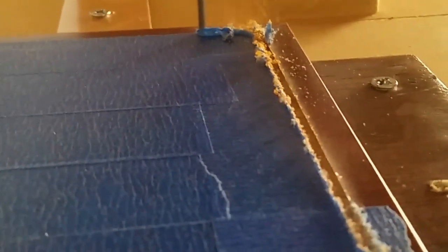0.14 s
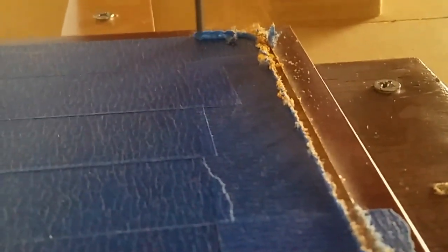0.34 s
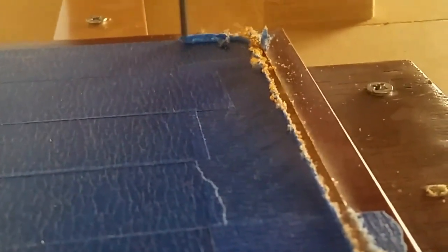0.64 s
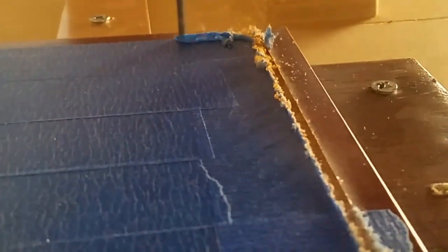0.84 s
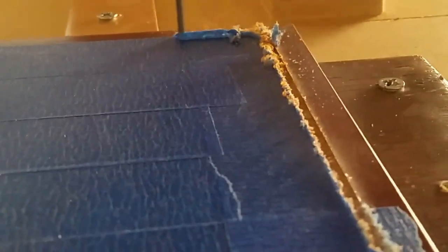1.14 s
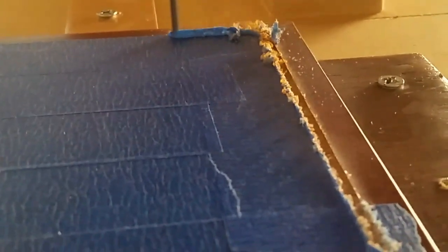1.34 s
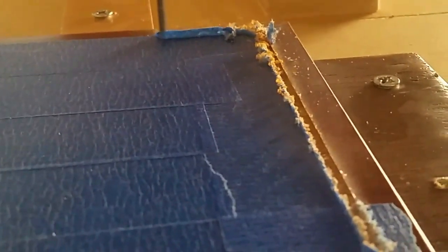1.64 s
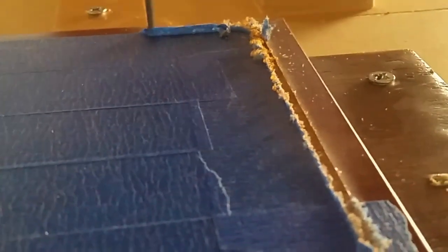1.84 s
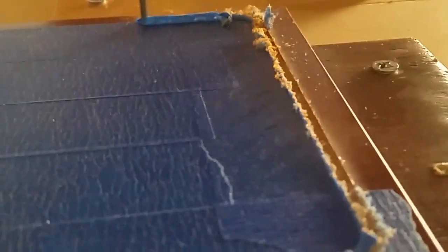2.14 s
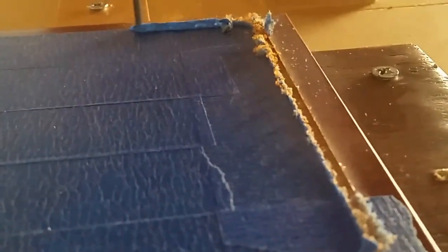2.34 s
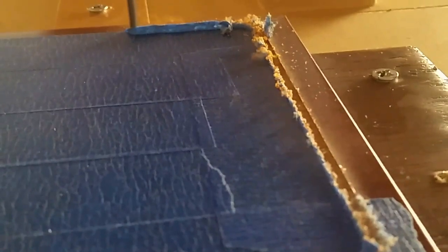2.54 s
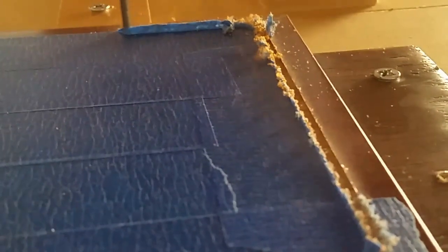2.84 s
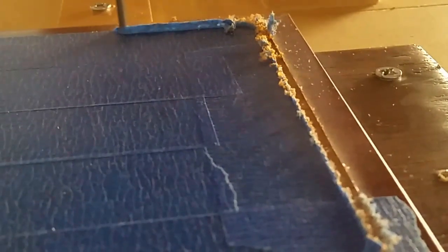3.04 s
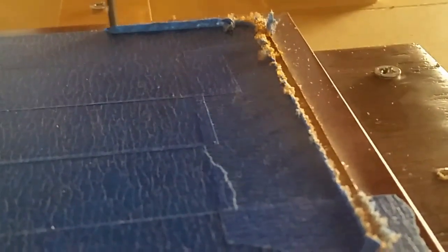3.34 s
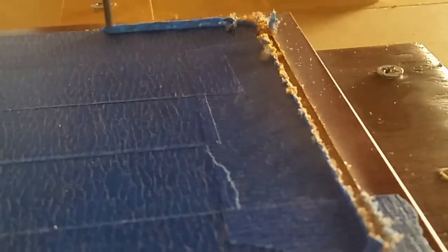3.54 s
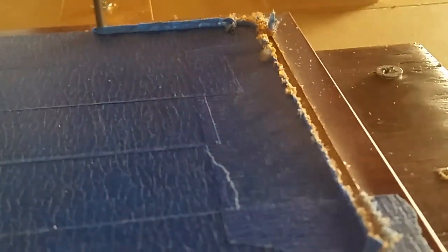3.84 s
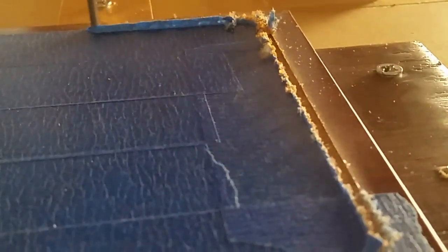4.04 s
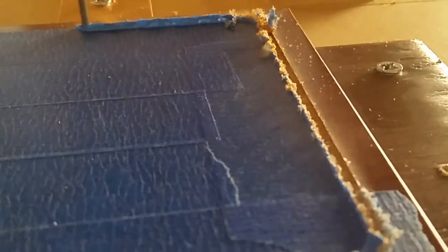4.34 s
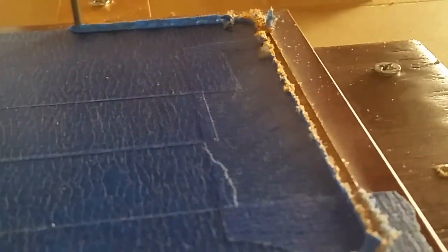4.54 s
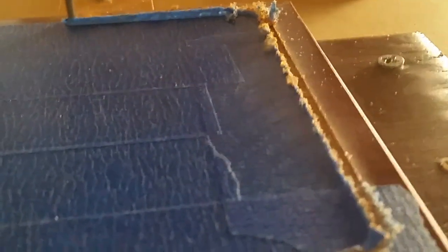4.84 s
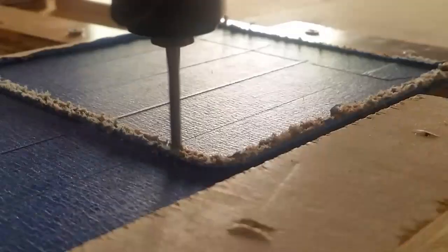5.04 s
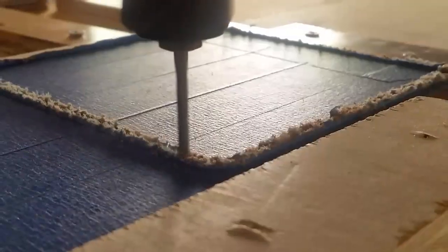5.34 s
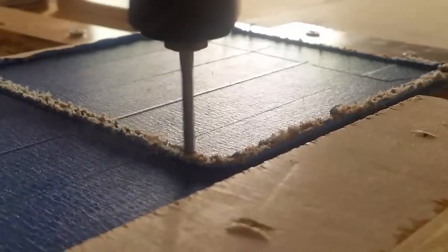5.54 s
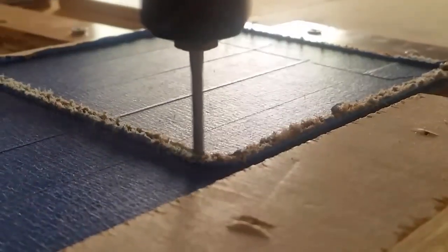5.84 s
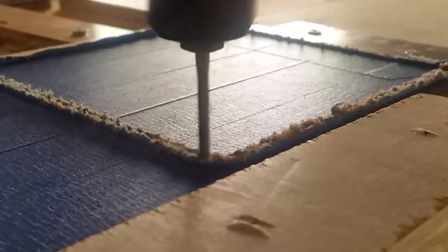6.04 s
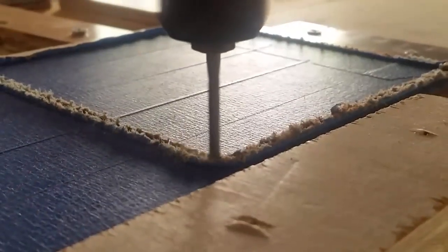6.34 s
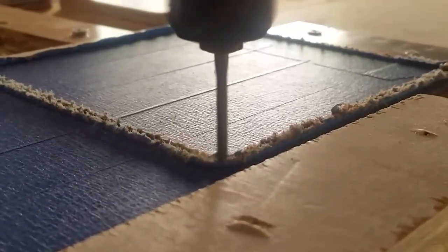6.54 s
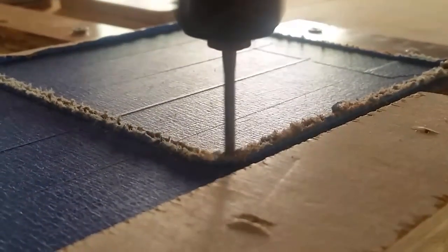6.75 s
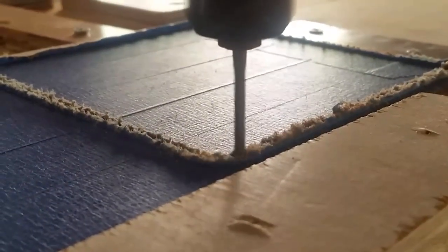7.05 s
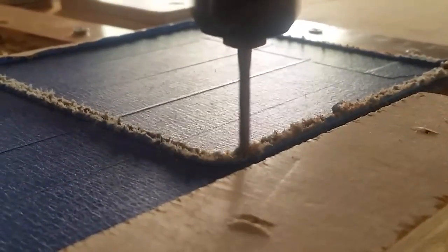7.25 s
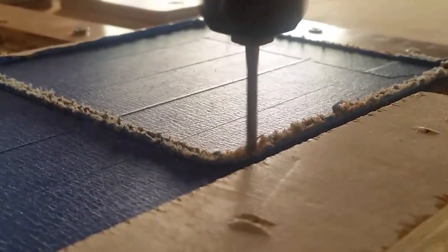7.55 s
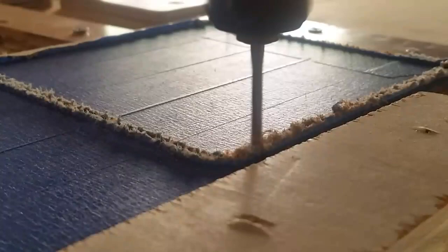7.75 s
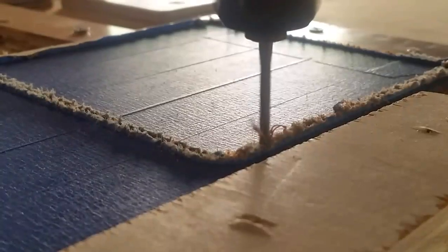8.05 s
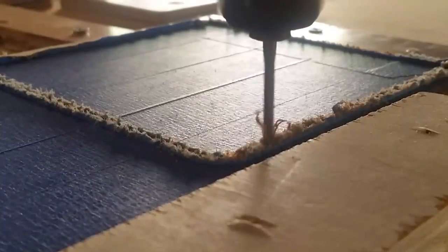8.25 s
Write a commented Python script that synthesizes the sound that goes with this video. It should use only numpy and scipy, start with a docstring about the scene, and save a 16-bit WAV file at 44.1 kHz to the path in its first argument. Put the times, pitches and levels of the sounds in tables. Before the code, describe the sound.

Close and dry, a fast spindle drones around a mid-low pitch with many piercing overtones, over rushing fan air and the sizzling scrape of a cutter in hard wood. Two soft thuds occur during this harsh cut. After about five seconds it stops dead, silent for under half a second. A much softer whine and fan rush then swell in, with short gliding feed-motor hums at the bend and low thumps near the end.

```python
"""In a workshop, a CNC router cuts a hardwood board: first deep along a straight edge, then, after a
short silence, lightly round a corner. The spindle turns about 435 times a second and whines on its multiples.
Its fan rushes as shaped noise; in the deep cut, blurred bearing tones sing and chips ring the cutter's modes.
The feed motors hum in gliding tones through the bend, dull knocks are dotted about, and a limiter
holds the peaks."""
import sys
import numpy as np
from scipy import signal
from scipy.fft import rfft, irfft, next_fast_len
from scipy.io import wavfile
from scipy.ndimage import uniform_filter1d, minimum_filter1d

SR = 44100
rng = np.random.default_rng(int(sys.argv[2]) if len(sys.argv) > 2 else 0)


def log_audio(samples):
    """Write samples as a 16-bit WAV file to the path given in sys.argv[1]."""
    # one column per channel
    frames = np.atleast_2d(samples).T
    # limit to full scale, then quantise
    limited = np.clip(frames, -1, 1)
    pcm = np.round(limited * 32767).astype(np.int16)
    wavfile.write(sys.argv[1], SR, pcm)


N = 369999
TIME = np.arange(N) / SR  # s
PADDED = next_fast_len(N)
FREQ = np.maximum(np.arange(PADDED // 2 + 1) * SR / PADDED, 1)  # Hz, kept off zero

# the spindle's whine in each part of the two cuts:
# multiple of the speed, edge_start_db, edge_end_db, before_bend_db, after_bend_db
WHINE_LEVELS = [(1, -25.5, -25, -30.5, -31.5), (2, -20, -21.5, -31, -33), (3, -28, -30.5, -35, -32),
                (4, -35, -36.5, -39.5, -48), (5, -33, -43.5, -40.5, -36.5), (6, -32, -38.5, -49, -49),
                (7, -32.5, -39, -50, -44.5), (8, -56.5, -46, -57, -58), (9, -41.5, -41.5, -47, -41.5),
                (10, -33.5, -32.5, -40, -40.5), (11, -44.5, -43.5, -57, -57), (12, -40.5, -54.5, -54, -53),
                (13, -46.5, -41.5, -48, -44), (14, -36, -35.5, -45, -44.5), (15, -29, -40.5, -39, -40.5),
                (16, -34, -44.5, -42, -41), (17, -50, -45, -55, -44), (18, -59.5, -49.5, -62, -61),
                (20, -64.5, -44, -58, -55), (22, -45, -43, -38.5, -37.5), (23, -63, -59.5, -58, -54),
                (27, -65, -62.5, -60, -54)]
# spectrum of the fan air and the rush of dust; the deep cut's air also sinks a little along the edge:
# pitch_hz, deep_cut_db_per_hz (relative), corner_cut_db_per_hz
AIR_SPECTRUM = [(25.2, -92, -90), (45, -86, -78), (70, -67.5, -69), (157, -59.5, -62.5), (454, -60, -62.5),
                (1060, -54, -59.5), (2400, -60, -63.5), (4080, -59.5, -64.5), (5450, -60.5, -66.5),
                (6740, -59.5, -67.5), (7560, -57.5, -68.5), (8710, -69, -76), (9970, -72, -70.5),
                (11800, -65, -67.5), (15500, -66.5, -68)]


def undb(db):
    """Decibels to gain."""
    return 10 ** (np.asarray(db) / 20)


def unit(x):
    """Scale to rms 1."""
    return x / np.std(x)


def walk(rate):
    """A smooth random wander with spread near 1, through `rate` new values a second."""
    knots = rng.standard_normal(4096)
    place = TIME * rate % (len(knots) - 1)
    k = place.astype(int)
    part = place - k
    ease = part * part * (3 - 2 * part)
    return knots[k] + (knots[k + 1] - knots[k]) * ease


def progress(start_s, end_s):
    """Runs evenly from 0 to 1 during a move."""
    return np.interp(TIME, [start_s, end_s], [0, 1])


def bell(middle_s, half_s):
    """A smooth swell that reaches 1 at its middle."""
    return np.exp(-((TIME - middle_s) / half_s) ** 2)


def shape(x, response):
    """Filter by a frequency response."""
    return irfft(rfft(x, PADDED) * response, PADDED)[:N]


def resonance(hz, width_hz):
    """Response of one steep-sided mode, two equal stages in a row, with gain 1 at its centre."""
    detuning = (FREQ / hz - hz / FREQ) * hz / width_hz
    return 1 / (1 + 1j * detuning) ** 2


def ripple(depth):
    """The motor pulls harder twice in each mains cycle, so the level throbs at 120 Hz."""
    return 1 + depth * np.sin(2 * np.pi * 120 * TIME)


def reflected(x, share, drift):
    """A bounce off the board, about 2 ms late; its path shifts as the head moves, so the colour drifts."""
    lag_s = 0.002 * (1 + drift * walk(1.2))
    bounce = np.interp(TIME - lag_s, TIME, x)
    return (x + share * bounce) / np.sqrt(1 + share ** 2)


def shaft_angle():
    """How far the spindle has turned, in radians; it drives the whine, the fan and the chips."""
    # the spindle sags under load in the deep cut and recovers round the bend: time_s, turns_per_s
    spindle_speed = [(0, 435.6), (3.5, 434.95), (4.97, 433.8), (5.35, 435.3), (6.2, 435.3), (6.9, 436.4),
                     (8.39, 436.3)]
    turns_per_s = np.interp(TIME, *np.transpose(spindle_speed))
    return 2 * np.pi * np.cumsum(turns_per_s) / SR


def knocks():
    """Each knock is a short, broad thud of filtered noise round its pitch."""
    # dull knocks of the gantry and board: start_s, pitch_hz, level_db (of the noise, ahead of its decay)
    knock_list = [(1.795, 180, -28), (3.16, 150, -27), (7.72, 75, -36), (8.045, 90, -27), (8.205, 220, -29)]
    out = 0
    for start_s, hz, db in knock_list:
        age = np.maximum(TIME - start_s, 0)
        thud = unit(shape(rng.standard_normal(N), resonance(hz, hz)))
        envelope = np.minimum(age / 0.004, 1) * np.exp(-age / 0.03)  # 4 ms rise, 30 ms decay
        out = out + undb(db) * thud * envelope
    return out


def feed_motors():
    """A stepper's tone glides with the speed of its axis and swells as it crosses a resonance."""
    # round the bend one feed motor speeds up and the other slows down, humming where the frame resonates:
    # middle_s, half_length_s, step_tone_hz, glide_hz_per_s, level_db
    feed_hums = [(6.23, 0.028, 176.5, 500, -32.5), (6.38, 0.05, 255, 489.5, -42),
                 (6.668, 0.09, 386, -360, -38)]
    out = 0
    for middle_s, half_s, hz, glide_hz_per_s, db in feed_hums:
        steps = np.cumsum(hz + glide_hz_per_s * (TIME - middle_s)) / SR
        tone = np.sqrt(2) * np.sin(2 * np.pi * steps)
        out = out + undb(db) * bell(middle_s, half_s) * tone
    return out


def air(angle, spectrum_db, chop, flicker_db):
    """Fan rush: a low roar that throbs with the mains, and a hiss that pulses with every turn."""
    pitch_hz = np.array(AIR_SPECTRUM)[:, 0]
    density_db = np.interp(np.log(FREQ), np.log(pitch_hz), spectrum_db)
    density = undb(density_db) * np.sqrt(SR / 2)
    low = 1 / (1 + (FREQ / 1500) ** 4)  # the roar's share of the power; it hands over at 1500 Hz
    roar = rng.standard_normal(N) * undb(flicker_db * walk(25)) * ripple(0.065)
    hiss = unit(rng.standard_normal(N) * (1 + chop * np.cos(angle)) * ripple(0.02))
    return shape(roar, density * np.sqrt(low)) + shape(hiss, density * np.sqrt(1 - low))


def bearings(slip_hz):
    """The balls slip a little, so their tones are blurred into narrow bands of noise."""
    # bearing tones under side load, off the multiples of the speed: pitch_hz, relative_level_db
    bearing_tones = [(665, -41), (755, -48), (1425, -52), (2051, -44), (2992, -43), (3425, -41),
                     (3860, -42.5), (4134, -47.5), (4730, -50.5), (6029, -43), (6885, -39), (9020, -56),
                     (10320, -53), (11180, -53)]
    response = sum(undb(db) * resonance(hz, slip_hz) for hz, db in bearing_tones)
    power = sum(undb(db) ** 2 for hz, db in bearing_tones)
    return unit(shape(rng.standard_normal(N), response)) * np.sqrt(power)


def whine_levels(before_db, after_db, travel):
    """Each multiple slides from one level to another as the head travels; a few fade or swell on the way."""
    # single multiples fade or swell for a moment as the head moves:
    # multiple of the speed, middle_s, half_length_s, added_db
    passing_fades = [(22, 0.62, 0.5, -17), (2, 0.66, 0.43, 1), (3, 2.8, 0.22, -3.5), (15, 2.9, 0.55, -12),
                     (5, 3.75, 0.5, -9), (17, 3.5, 0.4, 8), (13, 3.85, 0.35, 3.5), (7, 4.35, 0.35, -12),
                     (22, 5.5, 0.3, -3)]
    levels_db = {}
    for row, before, after in zip(WHINE_LEVELS, before_db, after_db):
        levels_db[round(row[0])] = before + (after - before) * travel
    for k, middle_s, half_s, db in passing_fades:
        levels_db[round(k)] = levels_db[round(k)] + db * bell(middle_s, half_s)
    return levels_db


def whine(angle, levels_db, wander_db, flutter, jitter, hum):
    """Multiples of the shaft speed, each wavering a little on its own."""
    angle = angle + jitter * walk(40)  # uneven grain brakes the shaft
    out = 0
    for k, db in levels_db.items():
        phase = rng.uniform(0, 2 * np.pi)
        tone = np.sqrt(2) * np.sin(k * angle + phase) * (1 + flutter * walk(55))
        wander = wander_db * walk(4) * min(k / 8, 1)  # the lowest multiples are steadier
        out = out + undb(db + wander) * tone
    return out * ripple(hum)


def chips(angle, bite, scatter_db):
    """Fibres snap in a burst each time the edge enters the wood; no two chips are the same size."""
    burst = np.exp(bite * np.cos(angle)) * undb(scatter_db * walk(435))
    return unit(rng.standard_normal(N) * burst)


def cutter(angle, bite_db, flare_db):
    """Chips ring each mode of the cutter; the ring flares where the grain is hard."""
    # cutter and collet modes; some take over as the cutter bites harder:
    # pitch_hz, width_hz (of each filter stage), relative_level_db, growth (dB gained per dB of bite)
    cutter_modes = [(5020, 380, -34.5, -0.5), (6060, 290, -35.5, -1), (6650, 710, -29.5, -0.2),
                    (7304, 440, -29, 1.5), (8130, 250, -38, 1.5), (10830, 120, -44, 1.5),
                    (14730, 990, -44, 5.5)]
    out = 0
    for hz, width_hz, db, growth in cutter_modes:
        ring = unit(shape(chips(angle, bite=0.23, scatter_db=-0.4), resonance(hz, width_hz)))
        out = out + ring * undb(db + growth * bite_db + flare_db * walk(15))
    return out


def corner_cut(angle):
    """A light cut: mostly motor and fan, with a faint rasp of the cutter."""
    bend = progress(6.05, 6.6)  # the move round the bend changes the colour of the whine
    levels_db = whine_levels(*np.array(WHINE_LEVELS).T[3:], bend)
    tones = whine(angle, levels_db, wander_db=1.9, flutter=0.067, jitter=0.012, hum=0.05)
    rush = air(angle, np.array(AIR_SPECTRUM)[:, 2], chop=0.11, flicker_db=0.25)
    rasp = unit(shape(chips(angle, bite=0.4, scatter_db=3), resonance(7150, 700)))
    return tones + rush + undb(-40.5) * rasp


def deep_cut(angle):
    """Full depth: chips ring the cutter and the side load makes the bearings sing."""
    travel = progress(0.76, 3.4)  # the move along the edge changes the colour of the whine
    levels_db = whine_levels(*np.array(WHINE_LEVELS).T[1:3], travel)
    tones = whine(angle, levels_db, wander_db=1.0, flutter=0.084, jitter=0.013, hum=0.05)
    rush = air(angle, np.array(AIR_SPECTRUM)[:, 1], chop=0.36, flicker_db=0.3)
    rush = rush * undb(0.5 - 0.94 * travel)  # the air sinks a little along the edge
    # the cutter bites harder as it gets into the edge
    light_bite_db, full_bite_db = -4, 1.84
    bite_db = light_bite_db + (full_bite_db - light_bite_db) * progress(0.8, 2.2)
    ring = undb(1.06) * cutter(angle, bite_db, flare_db=1.0)
    return tones + reflected(rush + ring, share=0.12, drift=0.044) + undb(2.2) * bearings(slip_hz=30)


def scene():
    """The deep cut stops dead; the corner cut fades in. Both are heard in the centre."""
    cut_off_s, fade_in_s, fade_length_s = 4.9716, 5.347, 0.29
    angle = shaft_angle()
    edge = deep_cut(angle) * (TIME < cut_off_s)
    corner = corner_cut(angle) * np.clip((TIME - fade_in_s) / fade_length_s, 0, 1)
    mono = edge + corner + feed_motors() + knocks()
    return np.array([mono, mono])


def limiter(x, ceiling_db, size):
    """The gain ducks smoothly round every peak that passes the ceiling, over `size` samples."""
    headroom = np.minimum(1, undb(ceiling_db) / (np.abs(x).max(axis=0) + 1e-9))
    return x * uniform_filter1d(minimum_filter1d(headroom, size), size)


def record(dry):
    """The recorder limits the peaks, blocks the lowest rumble and cuts the top steeply."""
    held = limiter(dry, ceiling_db=-9, size=41)
    rumble_block = signal.butter(2, 24, "highpass", fs=SR, output="sos")
    top_cut = signal.ellip(12, 0.1, 80, 15750, fs=SR, output="sos")  # 0.1 dB ripple, 80 dB down past the edge
    return signal.sosfilt(top_cut, signal.sosfilt(rumble_block, held))


dry = scene()
out = record(dry)
log_audio(out)
```